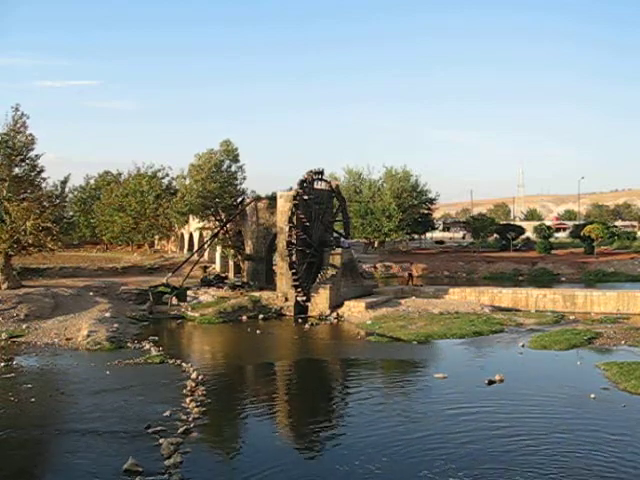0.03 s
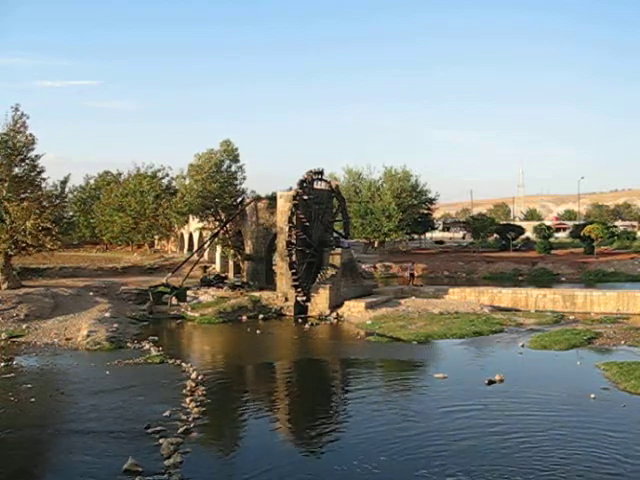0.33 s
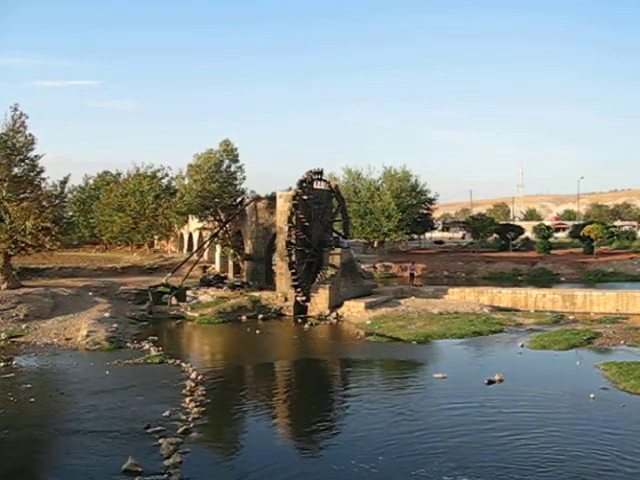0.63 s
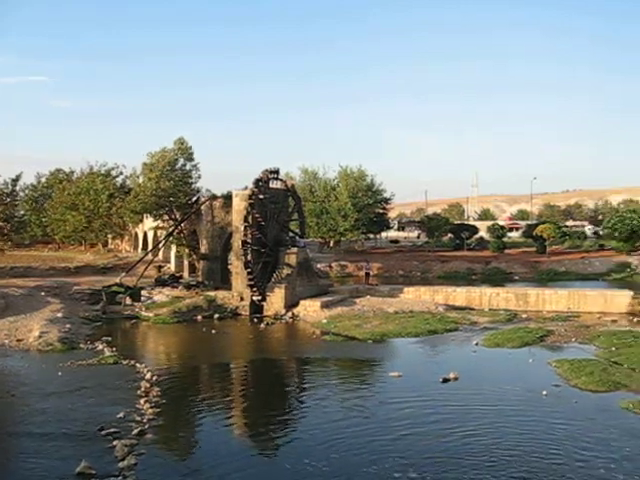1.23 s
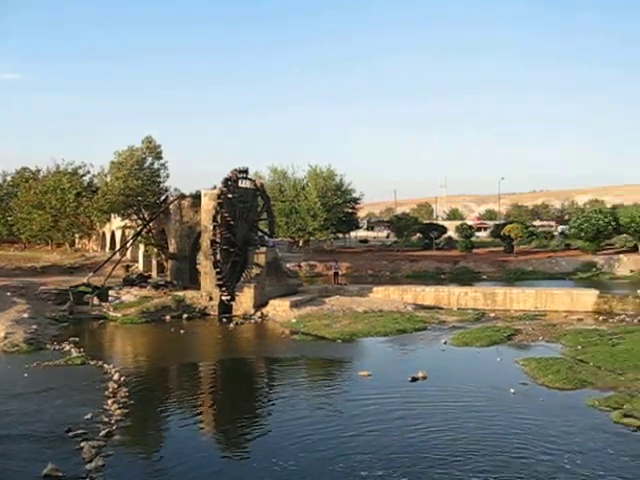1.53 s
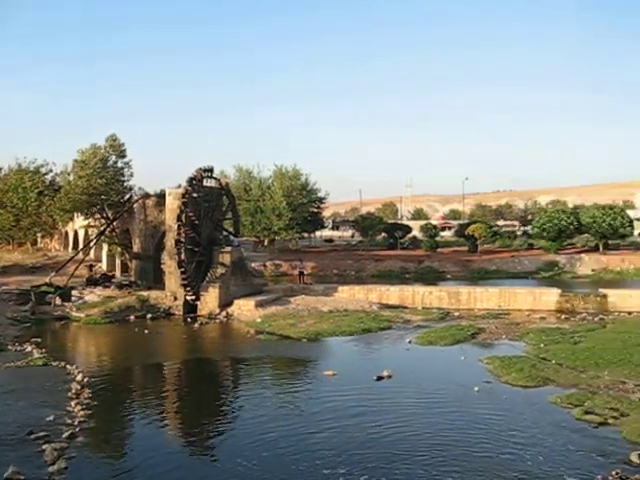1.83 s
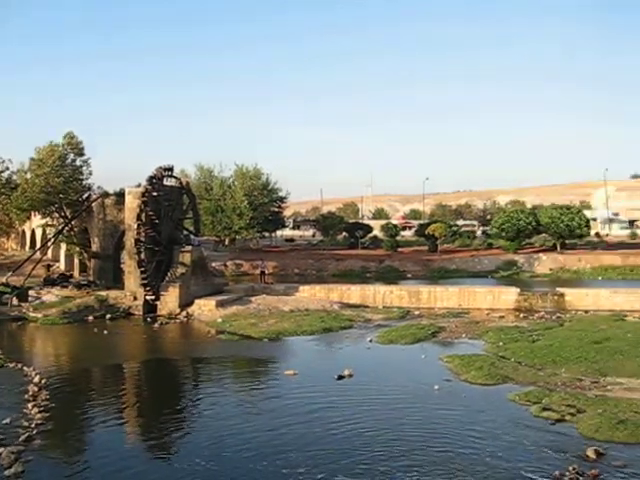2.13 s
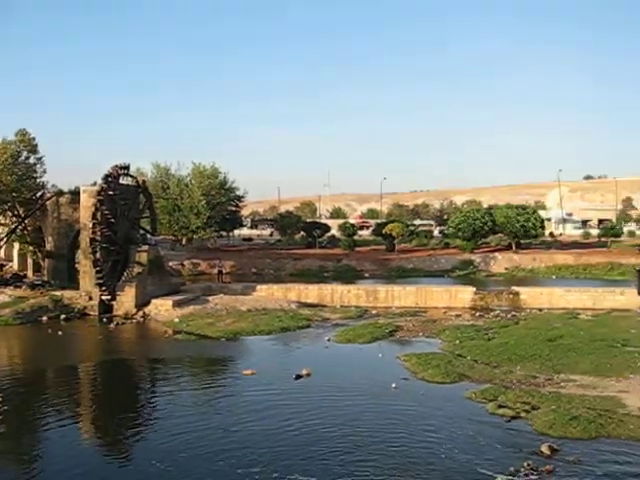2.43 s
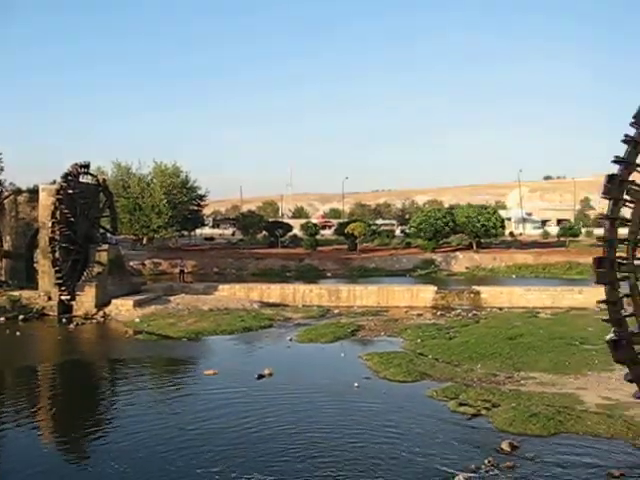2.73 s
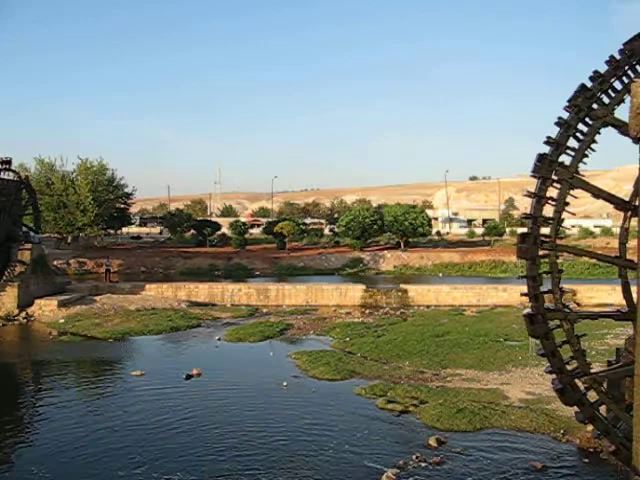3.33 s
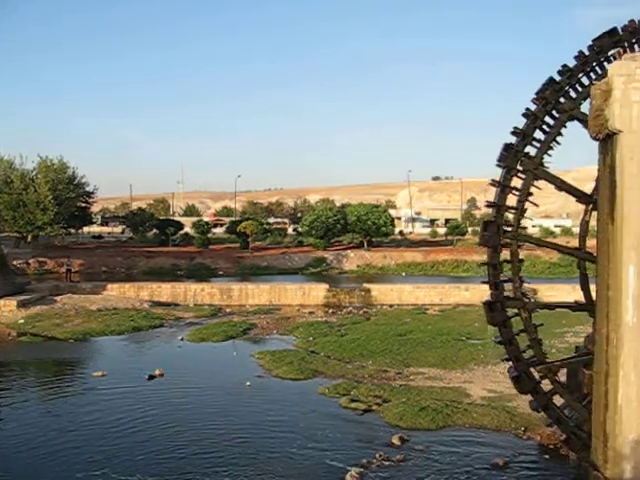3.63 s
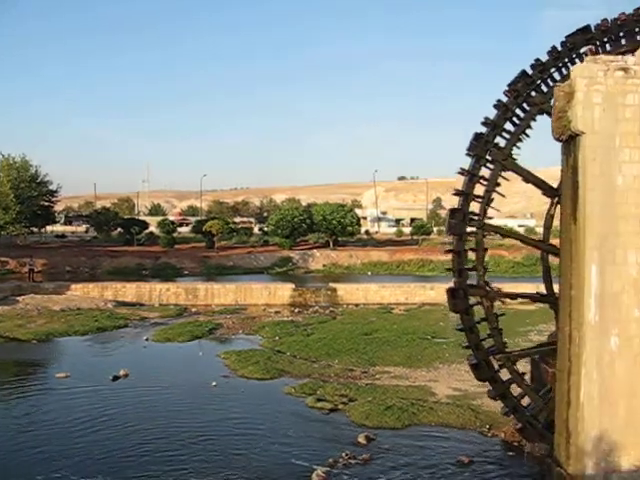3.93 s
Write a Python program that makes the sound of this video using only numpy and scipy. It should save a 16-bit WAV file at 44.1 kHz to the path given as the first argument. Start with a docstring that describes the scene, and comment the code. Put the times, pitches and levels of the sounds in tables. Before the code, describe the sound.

A big wooden waterwheel groans on its axle with a low, even tone that sags slightly in pitch. At about 1.8 seconds the groan gives way to a rough, throbbing judder, lasting until the end at 4 seconds. Water rushes and splashes throughout. Wind rumbles on the microphone, buffeting near 1.8, 3 and 3.7 seconds. The sound is dull, with a slight echo and one tiny tick near 3.4 seconds.

```python
"""On a river bank, by a big wooden waterwheel, with one microphone out in the wind.
The axle sticks and slips in its wooden bearing: first evenly, as a low pitched groan, then
unevenly, as a rough judder through the same timbers. Water pours and splashes behind the wheel,
stone walls throw the bearing's sound back and wind buffets the microphone.
The treble is dull, apart from one tiny bright tick near the end."""
import sys
import numpy as np
from scipy import signal
from scipy.io import wavfile
from scipy.ndimage import uniform_filter1d

SR = 44100
rng = np.random.default_rng(int(sys.argv[2]) if len(sys.argv) > 2 else 0)


def to_wav(sig):
    """Store sig (one row per channel, or 1-D mono) as 16-bit WAV at the path in sys.argv[1].

    Samples outside -1..1 are clipped; the rate is SR.
    """
    pcm = np.clip(np.atleast_2d(sig), -1, 1) * 32767
    pcm = np.round(pcm).astype(np.int16)
    wavfile.write(sys.argv[1], SR, pcm.T)  # frames by channels


N = 176400

# modes of the wheel's timbers: f/Hz, width/Hz, gain under even slips/dB, gain under uneven slips/dB
TIMBER_MODES = [(92.7, 4.7, -33.5, -45.5), (188.9, 9.4, -24.5, -25), (263, 45, -48, -21),
                (287.9, 14.9, -22, -32), (486, 100, -46.5, -41.5), (581.4, 26, -34.5, -48),
                (649.5, 33, -36.5, -39.5), (763.4, 11, -36, -37.5), (946, 36.4, -24, -27.5),
                (1051, 79, -34.5, -31.5), (1169, 62, -45, -44.5), (1353, 40, -36.5, -41.5),
                (1532, 76, -38.5, -38.5), (2301, 85, -49.5, -59.5), (2933, 120, -50.5, -43.5),
                (3765, 53, -52.5, -63.5), (4890, 19, -54.5, -62)]


def groan():
    """The axle slips at even intervals and rings the timbers; the colour shifts as it turns."""
    # slips per second: t/s, f/Hz
    slip_rate = [(0, 97.76), (.18, 97.84), (.3, 97.53), (.45, 96.74), (.6, 95.8), (.75, 95.47),
                 (.92, 95.43), (1.1, 95.33), (1.28, 94.35), (1.4, 94.82), (1.7, 93.72), (1.85, 89.8)]
    # scatter of their timing: t/s, spread/ms
    slip_scatter = [(0, .02), (1.05, .025), (1.3, .05), (1.6, .07), (1.76, .14), (1.85, .3)]
    # their strength: t/s, level/dB
    slip_level = [(0, -0.5), (.5, -2.5), (.9, -2), (1.15, -3.5), (1.6, 0), (1.76, -.5), (1.85, -4),
                  (2.1, -34.5)]
    # borders between fundamental, bass, body, ring, nasal band and treble: f/Hz
    band_edges = [130, 230, 860, 1200, 1900]
    # boost or cut of the modes in each band: t/s, level/dB
    fundamental = [(0, -11), (.6, -4.5), (.9, 3), (1.5, 5.5), (1.75, -6)]
    bass = [(0, 1), (.55, 1.5), (.9, 1.5), (1.2, 3.5), (1.5, -3), (1.75, -6)]  # near 190 Hz
    ring = [(0, -7), (.52, -7), (.62, -2), (.74, -5), (.81, 0.5), (1.0, 0), (1.15, 0), (1.55, -4.5),
            (1.75, -7)]  # near 1 kHz
    nasal = [(0, -1), (.14, -3), (.21, 0.5), (.49, 3), (.58, -3.5), (.85, -3), (1.0, 0.5), (1.2, -4.5),
             (1.75, -5)]  # near 1.4 kHz
    treble = [(0, -1), (.2, 0.5), (.5, 4.5), (.65, 4), (1.1, 5.5), (1.25, 1.5), (1.75, -3)]  # above 2 kHz
    wobble_share, wobble_hz, echo_db = .002, 12, -12
    rate = curve(slip_rate) * (1 + wobble_share * drift(wobble_hz))
    count = np.cumsum(rate) / SR
    slip_samples = np.interp(np.arange(1, int(count[-1])), count, np.arange(N))
    scatter_s = (curve(slip_scatter) * rng.standard_normal(N))[slip_samples.astype(int)] / 1000
    slips = clicks(slip_samples / SR + scatter_s, SR / np.sqrt(2) / rate.mean())
    slips *= from_db(curve(slip_level))
    band_db = [curve(fundamental), curve(bass), 0, curve(ring), curve(nasal), curve(treble)]
    wood = 0
    for k, (hz, width_hz, db, _) in enumerate(TIMBER_MODES):
        gain = from_db(db + band_db[np.searchsorted(band_edges, hz)])
        wood += (-1) ** k * resonate(slips, hz, width_hz) * gain
    return wood + from_db(echo_db) * walls(wood)


def judder():
    """Blunt slips of uneven spacing and strength ring the same timbers, throbbing a little."""
    # the judder at the microphone: t/s, level/dB
    judder_level = [(0, -49), (.8, -45.5), (1.2, -42.5), (1.6, -33.5), (1.8, -31), (1.95, -27.5),
                    (2.2, -24), (2.6, -25), (2.84, -26), (2.865, -28.5), (3.3, -28.5), (3.45, -26),
                    (3.65, -25.5), (3.85, -29), (3.95, -24.5), (4, -31)]
    slip_hz, gap_scatter, spread_db, blunt_hz = 150, .3, 1.5, 2870
    throb_hz, throb_db, echo_db = 7.4, 2, -1.5
    gap_draw, size_draw = rng.standard_normal((1200, 2)).T
    times = np.cumsum(np.exp(gap_scatter * gap_draw)) / slip_hz
    slips = clicks(times, from_db(spread_db * size_draw))
    slips = signal.sosfilt(signal.butter(2, blunt_hz, fs=SR, output="sos"), slips)
    wood = sum((-1) ** k * resonate(slips, hz, width_hz) * from_db(db)
               for k, (hz, width_hz, _, db) in enumerate(TIMBER_MODES))
    throb_rate = throb_hz * (1 + 0.085 * drift(2))
    throb = np.sin(2 * np.pi * np.cumsum(throb_rate) / SR)
    with_echo = rms_one(wood + from_db(echo_db) * walls(wood))
    return with_echo * from_db(curve(judder_level) + throb_db * throb)


def water():
    """Water falls behind the wheel: a smooth rush with small ringing splashes scattered through it."""
    # spectrum of the rush: f/Hz, relative level/dB
    rush_spectrum = [(40, -6.5), (150, -3), (330, 2), (450, 1.5), (700, -0.5), (1200, -1.5), (1700, -7.5),
                     (2200, -11), (3000, -11.5), (3700, -19.5), (5100, -21), (5900, -22)]
    # the water at the microphone: t/s, level/dB
    water_level = [(0, -32.5), (.7, -32), (1.4, -29.5), (1.9, -30), (2.4, -29), (2.82, -29), (2.88, -34),
                   (3.0, -31), (3.5, -30), (4, -29.5)]
    splashes_per_s, splash_db, spread_db, ring_cycles, tilt_db_per_octave = 250, -19, 2, 10, -2
    sizes = from_db(spread_db * np.minimum(rng.exponential(1, N), 5)) * rng.choice([-1, 1], N)
    drops = sizes * (rng.random(N) < splashes_per_s / SR)
    pitches_hz, pitch_index = np.geomspace(700, 5000, 20), rng.integers(0, 20, N)
    splashes = 0
    for k, hz in enumerate(pitches_hz):
        ringing = resonate(drops * (pitch_index == k), hz, hz / ring_cycles) / hz ** .5
        splashes += ringing * from_db(tilt_db_per_octave * np.log2(hz / pitches_hz[0]))
    rush = banded_noise(rush_spectrum, flicker_db=1.6)
    return from_db(curve(water_level)) * (rush + from_db(splash_db) * rms_one(splashes))


def wind():
    """Wind right on the microphone: a lumpy rumble with a few harder buffets that reach higher."""
    # strength of the rumble: t/s, level/dB
    rumble_level = [(0, -33.5), (.4, -32.5), (.7, -28.5), (1.3, -28.5), (1.42, -27), (1.7, -26.5),
                    (1.79, -18), (1.88, -23), (2.05, -20.5), (2.25, -25), (2.78, -24.5), (2.84, -20.5),
                    (2.92, -21), (3.03, -17.5), (3.15, -25), (3.42, -26), (3.6, -22.5), (3.67, -24),
                    (3.8, -23.5), (4, -24.5)]
    # its spectrum: f/Hz, relative level/dB
    rumble_spectrum = [(18, -6), (38, 0), (60, -4.5), (90, -4), (130, -7.5), (200, -17.5), (400, -38.5),
                       (900, -71)]
    # hard buffets: t/s, length/s, level/dB, f/Hz
    buffets = [(2.857, 0.065, -19, 150), (3.038, 0.14, -26.5, 129), (3.664, 0.06, -24, 143)]
    width_hz = 110
    t = np.arange(N) / SR
    out = from_db(curve(rumble_level)) * evened(banded_noise(rumble_spectrum, flicker_db=1.5))
    air = rng.standard_normal(N)
    for peak_s, length_s, db, hz in buffets:
        puff = evened(resonate(resonate(air, hz, width_hz), hz, width_hz))
        out += from_db(db) * np.exp(-(2 * (t - peak_s) / length_s) ** 2) * puff
    return out


def walls(x):
    """Diffuse echo from the masonry and the banks, thin in the bass."""
    t60_s, delay_s, low_cut_hz = 0.44, .015, 404
    t = np.arange(SR) / SR
    tail = rng.standard_normal(SR) * from_db(-60 * t / t60_s) * (t > delay_s)
    echo = signal.fftconvolve(x, tail / np.linalg.norm(tail))[:N]
    return signal.sosfilt(signal.butter(2, low_cut_hz, "high", fs=SR, output="sos"), echo)


def from_db(db):
    """Decibels to gain."""
    return 10 ** (np.asarray(db) / 20)


def rms_one(x):
    """Scale to unit rms."""
    return x / np.sqrt(np.mean(x ** 2) + 1e-20)


def evened(x):
    """Hold the level of a noise steady over a tenth of a second."""
    return x / np.sqrt(uniform_filter1d(x * x, size=SR // 10) + 1e-20)


def curve(rows):
    """A table of times and values, read at every sample."""
    return np.interp(np.arange(N) / SR, *np.transpose(rows))


def drift(hz):
    """Slow random wander of spread 1."""
    step, settle = 40, 2000
    r = np.exp(-2 * np.pi * hz * step / SR)
    white = rng.standard_normal(N // step + settle + 2)
    slow = signal.lfilter([1], [1, -2 * r, r * r], white)[settle:]
    return np.interp(np.arange(N) / step, np.arange(len(slow)), rms_one(slow))


def resonate(x, hz, width_hz):
    """A resonance with gain 1 at its top."""
    r = np.exp(-np.pi * width_hz / SR)
    feedback = [1, -2 * r * np.cos(2 * np.pi * hz / SR), r * r]
    return signal.lfilter(np.array([1, 0, -1]) * (1 - r * r) / 2, feedback, x + 1e-18)


def clicks(times, sizes):
    """Impulses at the given times, shared between neighbouring samples."""
    at = np.clip(times * SR, 0, N)
    whole, out = at.astype(int), np.zeros(N + 2)
    np.add.at(out, whole, sizes * (1 - at + whole))
    np.add.at(out, whole + 1, sizes * (at - whole))
    return out[:N]


def banded_noise(spectrum, flicker_db):
    """Third-octave bands of noise, each flickering by itself; rms 1."""
    hz, db = np.transpose(spectrum)
    edges_hz = 16 * 2 ** (np.arange(27) / 3)
    white, out = rng.standard_normal((2, N + SR)), 0
    for k, (low, high) in enumerate(zip(edges_hz, edges_hz[1:])):
        band_pass = signal.butter(2, [low, high], "band", fs=SR, output="sos")
        band = signal.sosfilt(band_pass, white[k % 2])[SR:]
        level_db = np.interp(np.log(low * high) / 2, np.log(hz), db)
        out += band * from_db(level_db + flicker_db * drift(hz=11))
    return rms_one(out)


def scene():
    """Wheel, river and wind at one microphone."""
    return (groan() + judder() + water() + wind())[None]


def record(dry):
    """The narrow-band recorder rolls the treble off, then cuts it; one tiny bright tick sits on top."""
    roll_off_hz, cutoff_hz, top_hz = 5260, 6350, 16000
    tick_s, tick_db = 3.4235, -19.5
    dull = signal.sosfilt(signal.butter(8, roll_off_hz, fs=SR, output="sos"), dry)
    dull = signal.sosfilt(signal.cheby2(16, 60, cutoff_hz, fs=SR, output="sos"), dull)
    tick = from_db(tick_db) * (np.arange(N) == int(tick_s * SR))
    return signal.sosfilt(signal.cheby2(16, 60, top_hz, fs=SR, output="sos"), dull + tick)


dry = scene()
out = record(dry)
to_wav(out)
```